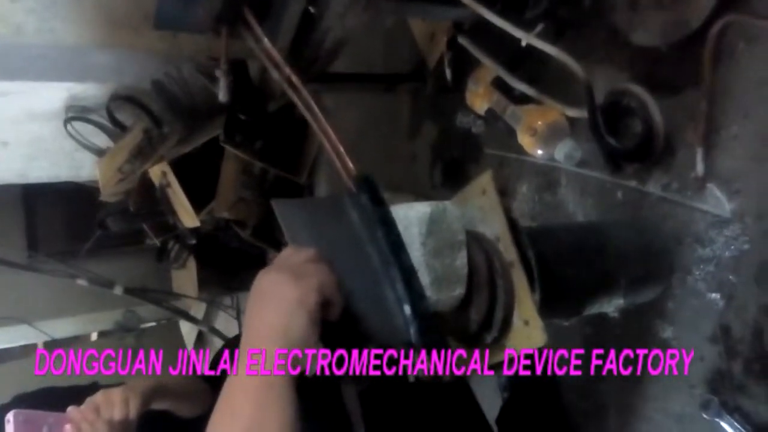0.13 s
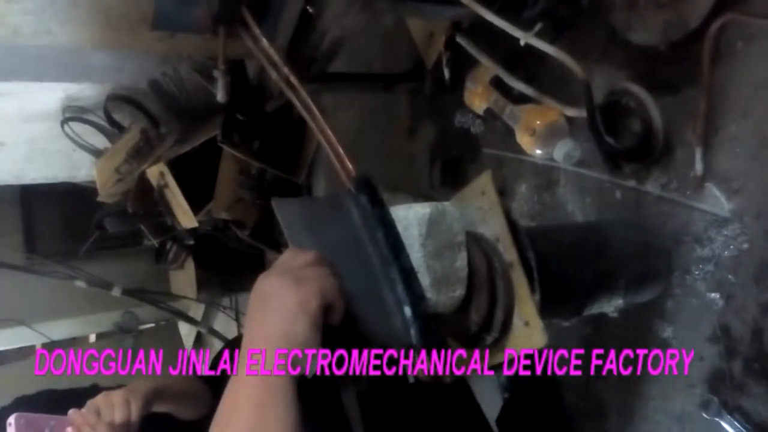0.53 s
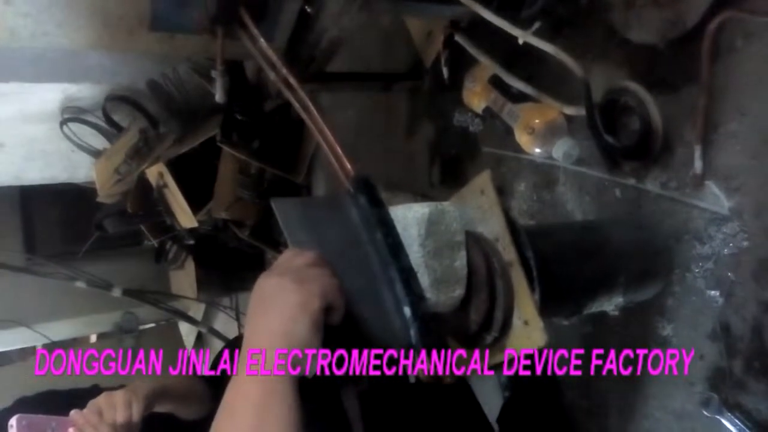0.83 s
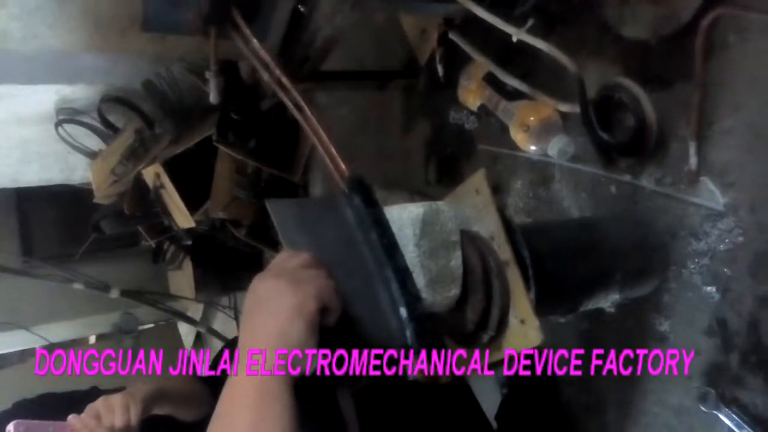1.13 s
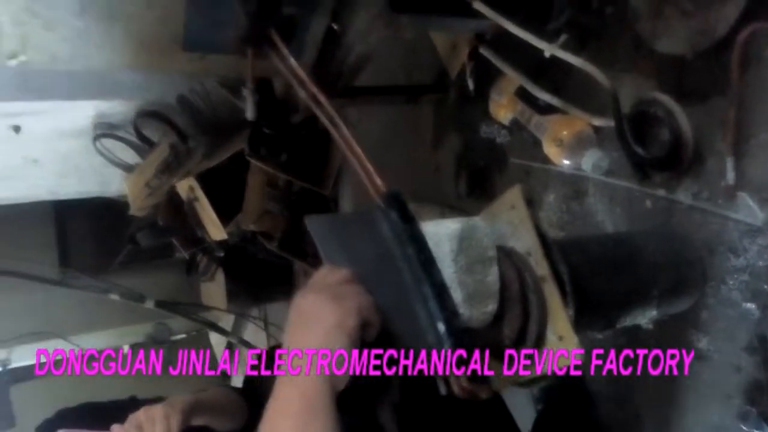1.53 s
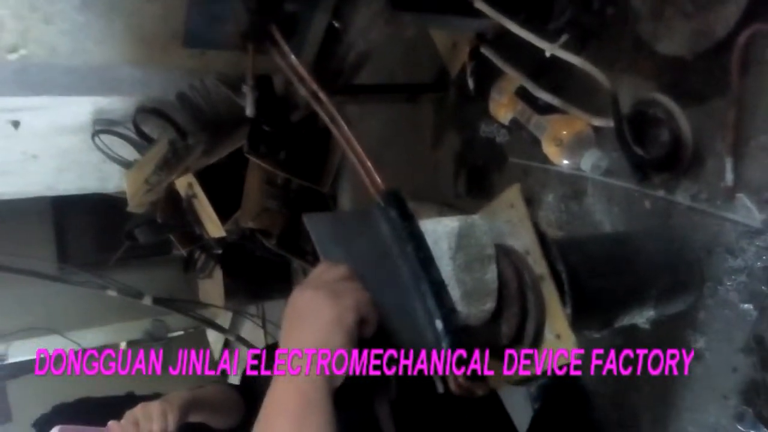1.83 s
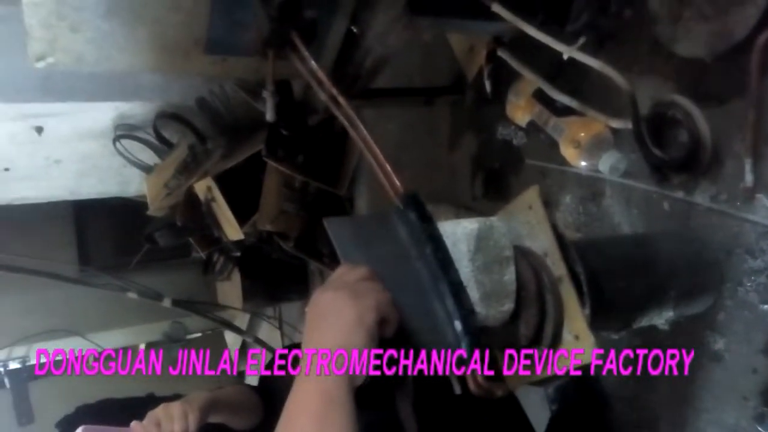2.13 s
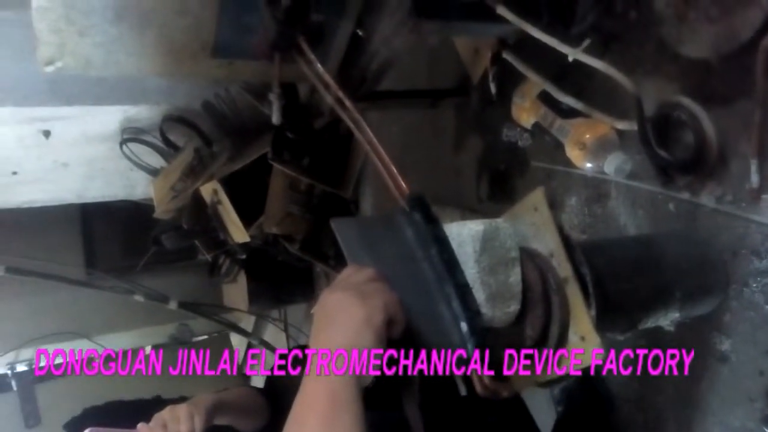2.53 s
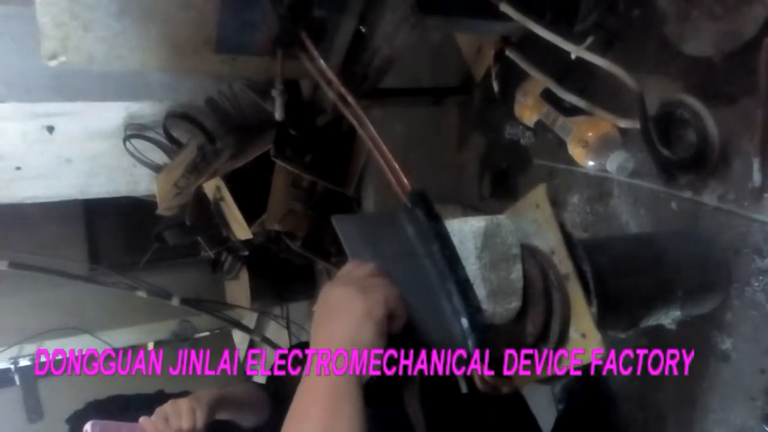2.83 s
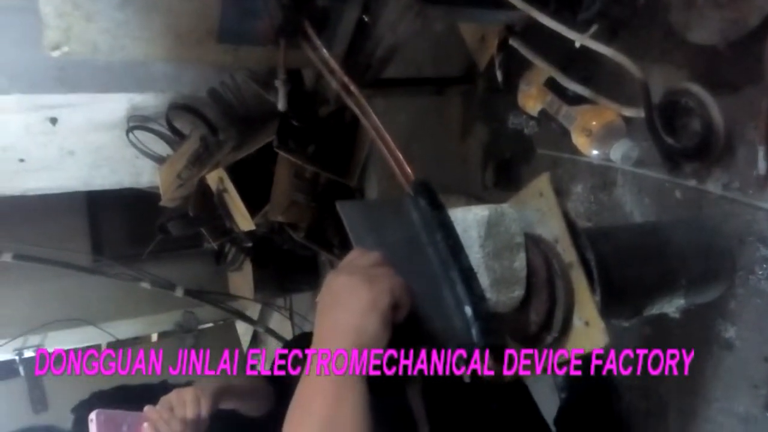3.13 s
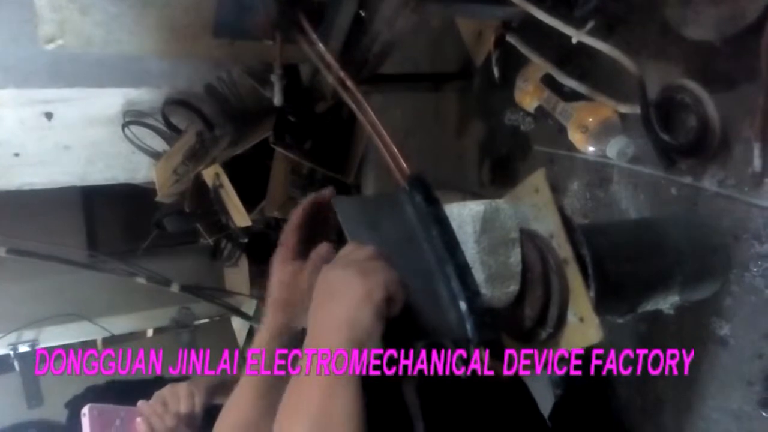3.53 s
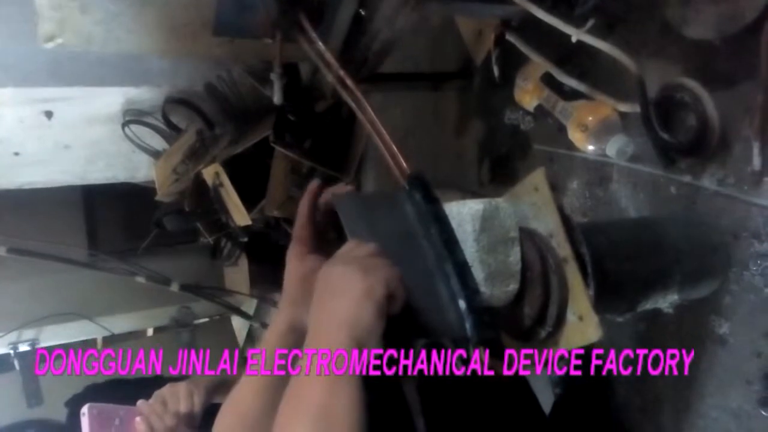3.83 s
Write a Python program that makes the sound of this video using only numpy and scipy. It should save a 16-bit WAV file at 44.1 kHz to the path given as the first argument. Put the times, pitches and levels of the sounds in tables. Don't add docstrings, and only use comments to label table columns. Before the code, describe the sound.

Dense cooling spray hisses without pause at a heating machine, strongest at the very start. A faint metallic ring dies at once, then three tiny squeaks follow; close stereo microphone, brighter on the left, slightly overloaded.

```python
import sys
import numpy as np
from scipy import signal
from scipy.fft import rfft, irfft
from scipy.io import wavfile
from scipy.ndimage import uniform_filter1d

SR = 44100
rng = np.random.default_rng(int(sys.argv[2]) if len(sys.argv) > 2 else 0)


def master(y):
    cut = np.clip(np.atleast_2d(y).T, -1, 1)
    pcm = np.round(cut * 32767)
    wavfile.write(sys.argv[1], SR, pcm.astype(np.int16))


def volts_from_db(level):
    exponent = np.asarray(level, float) / 20
    return 10 ** exponent


N = 175959

# (frequency [Hz], density [dB])
SPRAY_SPECTRUM = [(700, -27), (1500, -21), (2200, -13), (3500, -5.5), (5800, -1.5), (6500, -4),
                  (7900, -21.5), (15000, -39)]
# (frequency [Hz], difference [dB])
SPRAY_PORT_DIFFERENCE = [(700, -5), (1500, 2.5), (3000, 9), (5800, 12.5), (6600, 9), (8000, -2),
                         (14000, -2)]
# (time [s], level [dB])
SPRAY_PRESSURE = [
    (0.0, -14.5),
    (0.01, -16.5),
    (0.7, -17.5),
    (2.7, -16.5),
    (3.99, -16.5),
]
# (shaft order [-], level [dB], left over right [dB])
PUMP_ORDERS = [(2, -48, 1), (3, -36.5, -1), (4, -48.5, 3), (5, -58, 9), (6, -49, -3), (7, -48, -1),
               (8, -48, -1)]
# (frequency [Hz], level [dB], left over right [dB], wander [Hz])
WHINE_LINES = [(470, -58, -4, 1.56), (527.4, -52, 0, 1.5), (627.6, -39, 0.5, 1.48), (728, -50.5, 5, 1.15),
               (1201, -56, 11, 2.5), (1716, -42, 9.5, 1.2), (3253, -46, 21, 3.03), (3434, -32.5, 15, 2.2),
               (3488.5, -38, 11, 4)]
# (time [s], level [dB], left over right [dB])
SQUEAK_STROKES = [
    (.255, -32, 13),
    (1.572, -29.5, 10),
    (2.905, -35, 2),
]
# (frequency [Hz], density [dB])
RUMBLE_SPECTRUM = [(15, -51), (25, -12), (48, -22.5), (128, -7.5), (220, -8), (563, -7), (625, -8.5),
                   (798, -12), (1600, -16.5), (2080, -43), (3520, -120)]
# (frequency [Hz], likeness [0-1])
RUMBLE_LIKENESS = [(40, 1), (130, .95), (300, 0.81), (630, 0.57), (1400, 0)]
# (frequency [Hz], density [dB])
AIR_SPECTRUM = [(900, -6), (1500, 0), (3500, 1.5), (6500, -2.5), (8000, -17), (11000, -16), (15000, -18)]

TIME_S = np.arange(N) / SR
FREQ_HZ = np.maximum(np.arange(N // 2 + 1) * SR / N, 1)


def read(table, hz):
    points = np.array(table, float)
    return np.interp(np.log(hz), np.log(points[:, 0]), points[:, 1])


def level(x, rms_db):
    return x * volts_from_db(rms_db) / np.sqrt(np.mean(x ** 2))


def walk(rate_hz):
    hold = int(SR / rate_hz)
    steps = np.repeat(rng.standard_normal(N // hold + 1), hold)
    drift = uniform_filter1d(uniform_filter1d(steps, hold), hold)[:N]
    return (drift - drift.mean()) / drift.std()


def pan(left_over_right_db):
    return volts_from_db(np.array([[left_over_right_db / 2], [-left_over_right_db / 2]]))


def phase_of(freq_hz):
    return 2 * np.pi * np.cumsum(freq_hz) / SR


def noise(gain, likeness, shared_db, flicker_db, flicker_hz):
    mid, side = rfft(rng.standard_normal((2, N)))
    likeness = np.clip(likeness, 0, 1)
    common = mid * np.sqrt(1 + likeness)
    apart = side * np.sqrt(1 - likeness)
    pair = gain * np.array([common + apart, common - apart])
    out, last = 0, walk(3.5)
    for half_octave in range(8, 29):
        new = walk(3.49)
        distance = np.clip(2 * np.log2(FREQ_HZ) - half_octave, -1, 1)
        band = np.cos(np.pi / 2 * distance) ** 2
        swing_db = shared_db * (last + new) / 2 + flicker_db * walk(flicker_hz)
        out = out + irfft(pair * band, N) * volts_from_db(swing_db)
        last = new
    return out


def room(x):
    t60_s, tail_db = 0.24, -3.5
    t = np.arange(SR // 2) / SR
    tail = rng.standard_normal((2, len(t))) * volts_from_db(-60 * t / t60_s)
    tail = tail / np.sqrt(np.sum(tail ** 2, axis=1, keepdims=True))
    diffuse = irfft(rfft(x) * rfft(tail, N), N)
    return (x + volts_from_db(tail_db) * diffuse) / np.sqrt(1 + volts_from_db(2 * tail_db))


def spray():
    half_db = read(SPRAY_PORT_DIFFERENCE, FREQ_HZ) / 2
    gain = volts_from_db(read(SPRAY_SPECTRUM, FREQ_HZ) + np.array([half_db, -half_db]))
    hiss = noise(gain, 0.0, shared_db=-0.37, flicker_db=0.51, flicker_hz=9)
    time_s, pressure_db = np.transpose(SPRAY_PRESSURE)
    return level(room(hiss), rms_db=3) * volts_from_db(np.interp(TIME_S, time_s, pressure_db))


def pump():
    shaft_hz = 43.25
    turn = phase_of(shaft_hz * (1 + 0.001 * walk(1.5)))
    out = 0
    for order, db, lr_db in PUMP_ORDERS:
        tone = np.sin(order * turn + 2 * np.pi * rng.random())
        out = out + np.sqrt(2) * volts_from_db(db + 0.91 * walk(4)) * pan(lr_db) * tone
    return out


def whine():
    out = 0
    for hz, db, lr_db, wander_hz in WHINE_LINES:
        phase = phase_of(hz + wander_hz * walk(8))
        tone = np.sin(phase + np.array([[0], [hz / 1500]]))
        out = out + np.sqrt(2) * volts_from_db(db + 1.5 * walk(6.01)) * pan(lr_db) * tone
    return out


def squeaks():
    start_hz, sag_hz_per_s, octave_db = 2279, 510, 10
    rise_s, fall_s = 0.017, 0.039
    out = 0
    for start_s, db, lr_db in SQUEAK_STROKES:
        t = TIME_S - start_s
        envelope = np.exp(-np.where(t < 0, (t / rise_s) ** 2, t / fall_s))
        phase = 2 * np.pi * (start_hz * t - sag_hz_per_s * np.clip(t, -0.3, 0.3) ** 2 / 2)
        tone = np.sin(phase) + volts_from_db(octave_db) * np.sin(2 * phase)
        out = out + volts_from_db(db + 2 * walk(40.06)) * envelope * pan(lr_db) * tone
    return room(out)


def ring():
    centre_hz, width_hz = 1660, 40
    end_s, fall_s = 0.087, 0.03
    resonance = 1 / (1 + ((FREQ_HZ - centre_hz) / width_hz) ** 2)
    tone = irfft(rfft(rng.standard_normal((2, N))) * resonance, N)
    decay = np.exp(-np.maximum(TIME_S - end_s, 0) / fall_s)
    return level(tone, rms_db=-32.5) * decay * pan(3)


def rumble():
    rolloff_db = 9 * np.maximum(np.log2(FREQ_HZ / 1600), 0)
    gain = volts_from_db(read(RUMBLE_SPECTRUM, FREQ_HZ) - rolloff_db)
    likeness = read(RUMBLE_LIKENESS, FREQ_HZ)
    low = noise(gain, likeness, shared_db=1.86, flicker_db=0.6, flicker_hz=6)
    return level(low, rms_db=-34.5) * pan(-0.6)


def blown_air():
    rolloff_db = 12 * np.maximum(np.log2(900 / FREQ_HZ), 0)
    gain = volts_from_db(read(AIR_SPECTRUM, FREQ_HZ) - rolloff_db)
    return level(noise(gain, 0.0, shared_db=3.5, flicker_db=2.1, flicker_hz=12), rms_db=-34)


def scene():
    return spray() + pump() + whine() + squeaks() + ring() + rumble() + blown_air()


def low_pass(x):
    return signal.sosfilt(signal.butter(12, 15260, fs=SR, output="sos"), x)


def record(dry):
    top_hz, clip_level = 15250, 1.0
    top_cut = signal.ellip(10, 0.2, 60, top_hz, fs=SR, output="sos")
    mix = np.clip(signal.sosfilt(top_cut, dry), -clip_level, clip_level)
    return low_pass(mix)


dry = scene()
out = record(dry)
master(out)
```